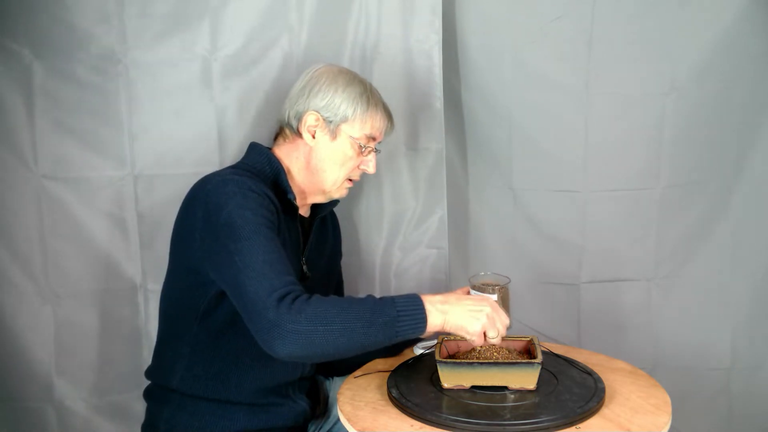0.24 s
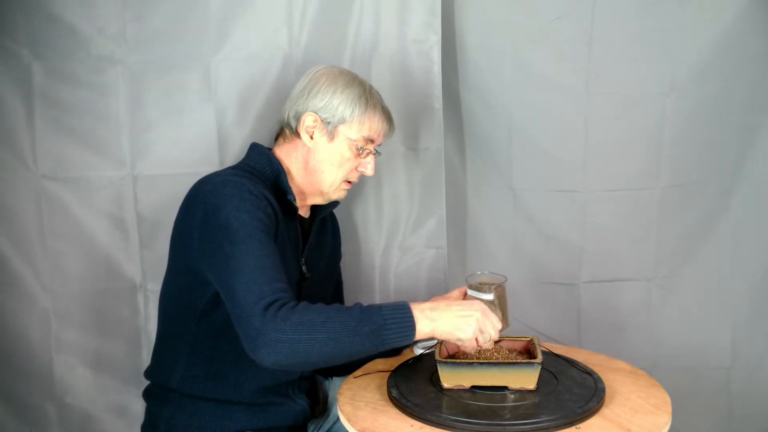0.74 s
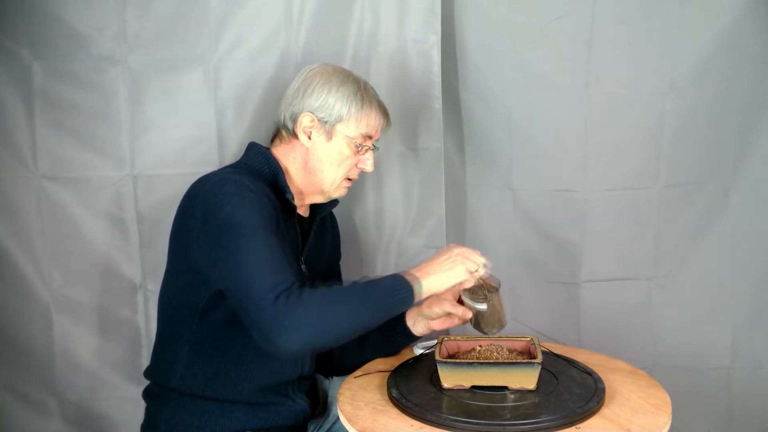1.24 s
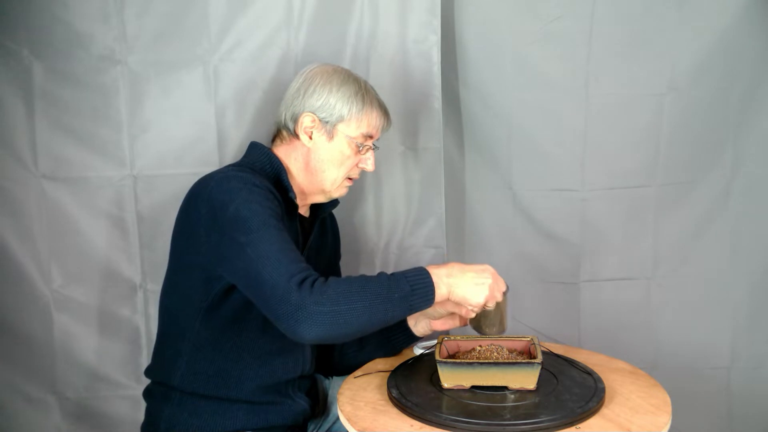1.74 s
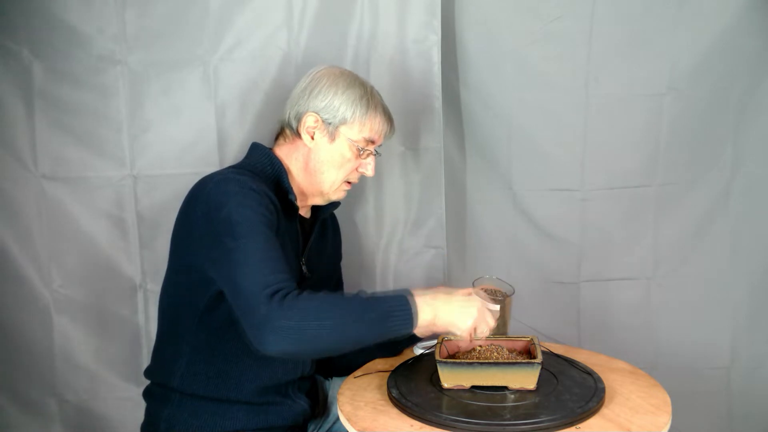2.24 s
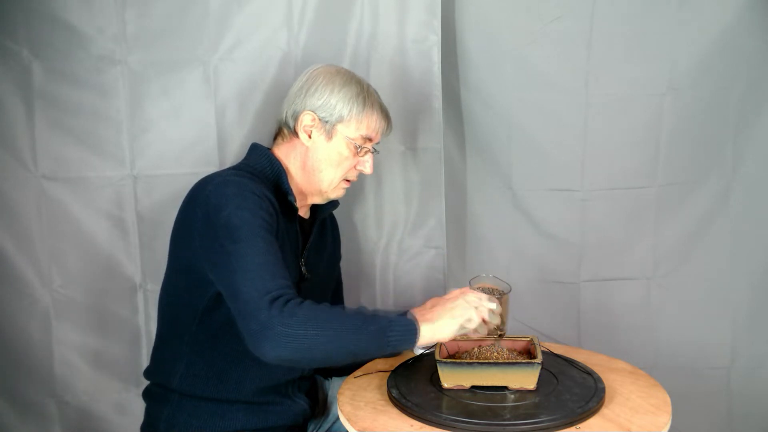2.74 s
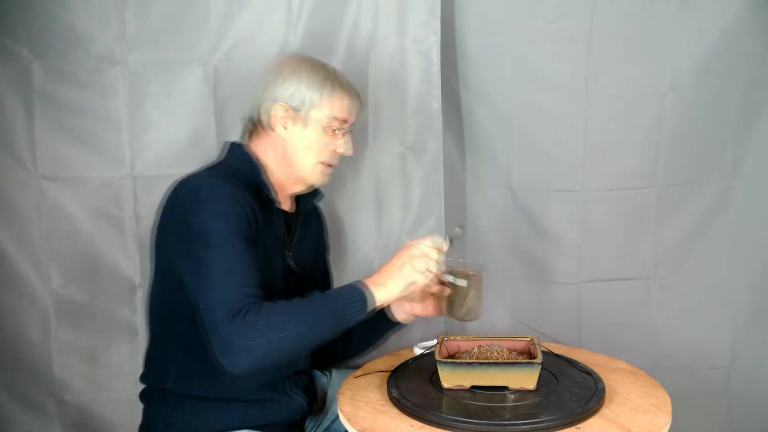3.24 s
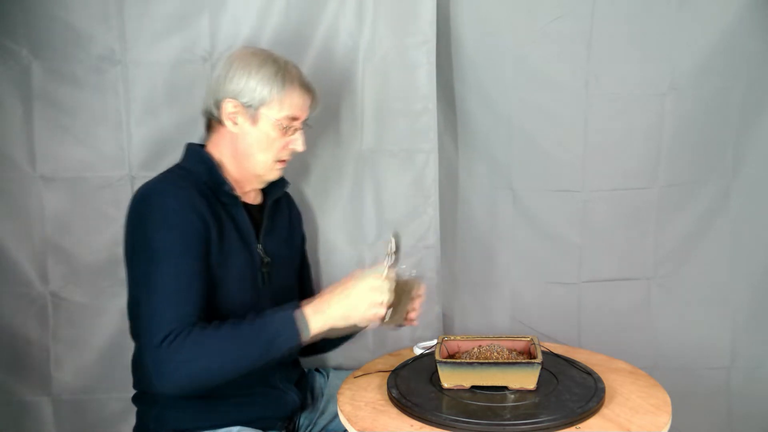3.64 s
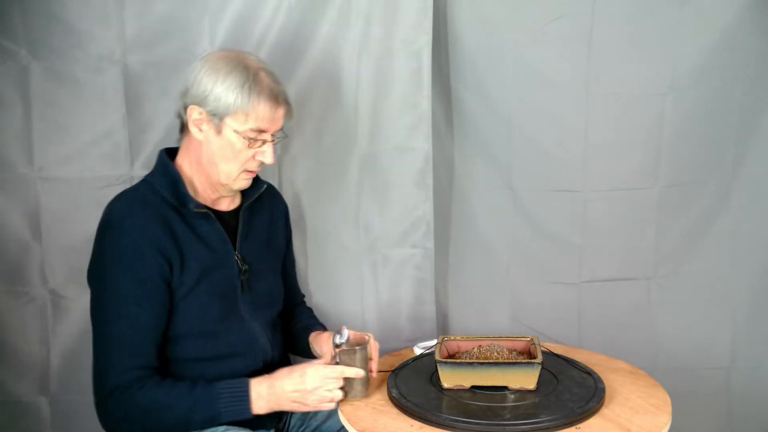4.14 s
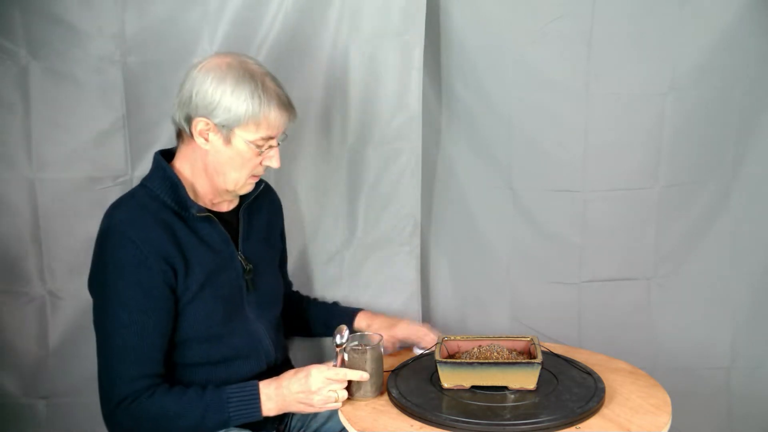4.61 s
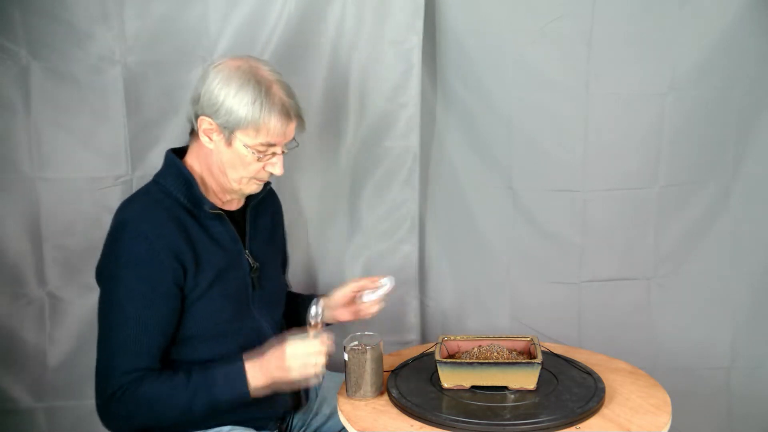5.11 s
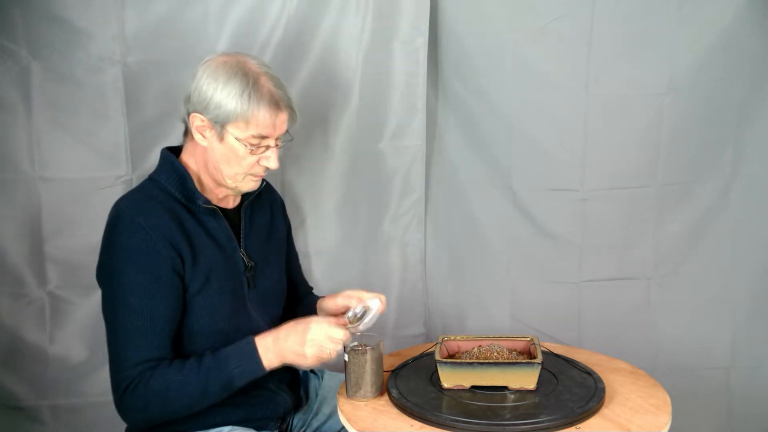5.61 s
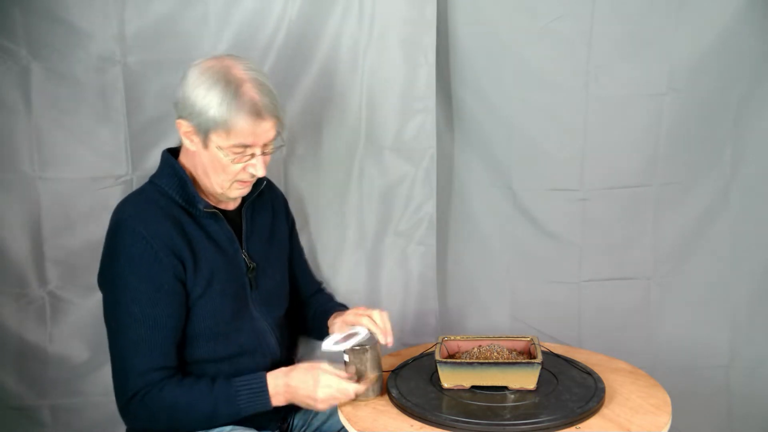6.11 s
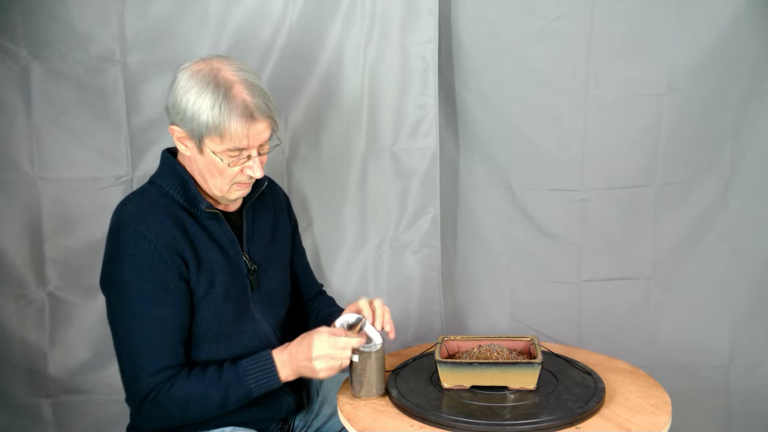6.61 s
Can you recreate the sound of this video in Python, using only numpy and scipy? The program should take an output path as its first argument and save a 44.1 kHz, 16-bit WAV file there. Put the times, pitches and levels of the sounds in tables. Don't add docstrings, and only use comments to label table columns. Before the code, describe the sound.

Sparse taps and a brief granule pour, a glass clink, a scraping, squeaking lid, then hard plastic rattles and a loud snap in a reverberant room.

```python
import sys
import numpy as np
from scipy import signal
from scipy.fft import rfft, irfft, next_fast_len
from scipy.io import wavfile
from scipy.ndimage import uniform_filter1d

SR = 44100
rng = np.random.default_rng(int(sys.argv[2]) if len(sys.argv) > 2 else 0)


def linear_from_db(decibels):
    return 10 ** (np.asarray(decibels, float) / 20)


def store_pcm(level_fs):
    pcm = np.round(np.clip(level_fs, -1, 1) * 32767).astype(np.int16)
    wavfile.write(sys.argv[1], SR, np.atleast_2d(pcm).T)


N = 302526

# centre in Hz, width in Hz, level in dB.
JAR_MODES = [(626, 196, 4.5), (1325, 340, 2.5), (1970, 380, -2.5), (2850, 900, 1.5), (3600, 430, 6),
             (5100, 1300, 0.5), (10900, 9300, -6.5)]
# centre in Hz, width in Hz, level in dB.
DRAGGED_LID_MODES = [(332, 110, -11), (533, 61, 0), (701, 53, -3.5), (858, 72, 0.5), (1306, 185, -2),
                     (1620, 480, -12.5), (2460, 670, 1.5), (3860, 860, 3.5), (5170, 2000, -2),
                     (10900, 8400, -29)]


def along(points, hz):
    f, v = np.transpose(points)
    return np.interp(np.log(hz + 1), np.log(f + 1), v)


def unit(x):
    return x / np.sqrt(np.mean(x ** 2) + 1e-20)


def coloured(spectrum):
    size = next_fast_len(N)
    white = rfft(rng.standard_normal(size))
    shape = linear_from_db(along(spectrum, np.fft.rfftfreq(size, 1 / SR)))
    return unit(irfft(white * shape, size)[:N])


def noise_swells():
    # start in seconds, hum lift in dB, hiss lift in dB, #
    # fading time in seconds.
    openings = [(1.01, 6.5, -0.5, 0.16), (1.25, 3.5, 3.5, 0.21), (3.34, 2, 2, 0.31), (3.97, 13, 6, 0.33),
                (4.13, -0.5, 2.5, .3), (4.7, 3, 5, 0.41), (4.9, 4, 4, 0.18), (5.41, 6, 8, 0.24),
                (5.66, 2.5, 8, 0.18), (5.85, 9, 4, 0.26), (6.01, 11.5, 14, 0.31), (6.16, 5, 11, 0.13)]
    opens_s = 0.04
    s, hum_db, hiss_db, closing_s = np.transpose(openings)
    since = np.maximum(np.arange(N) / SR - s[:, None], 0)
    swell = 1 - np.exp(-(since / opens_s) ** 2)
    opening = swell * np.exp(-(since / closing_s[:, None]) ** 2.04)
    return hum_db @ opening, hiss_db @ opening


def camera_noise():
    # frequency in Hz, density in dB per Hz.
    rumble_spectrum = [(25, 0.5), (60, 0), (80, -7), (100, -3.5), (160, -6), (250, -11), (400, -39)]
    # frequency in Hz, density in dB per Hz.
    hiss_spectrum = [(120, -32), (200, -5), (459, -6), (591, -8), (647, -8), (1240, -10.5), (1780, -12),
                     (15000, -17)]
    mains_hz, hum_rest_db, hiss_rest_db = 50, -62, -69
    hum_lift_db, hiss_lift_db = noise_swells()
    turn = 2 * np.pi * mains_hz * np.arange(N) / SR
    hum = np.sqrt(2) * (np.sin(turn + 0.64) + linear_from_db(-15.0) * np.sin(3 * turn + 1.32))
    low = hum + linear_from_db(-12.5) * coloured(rumble_spectrum)
    return linear_from_db(hum_rest_db + hum_lift_db) * low + linear_from_db(hiss_rest_db + hiss_lift_db) * coloured(hiss_spectrum)


def room(wet_db, direct_db=0):
    # frequency in Hz, time to fall 60 dB in seconds.
    decay = [(100, 0.87), (400, 0.34), (1200, 0.4), (1600, 0.46), (2000, 0.44), (4000, 0.49), (10000, 0.43)]
    # delay in seconds, level in dB.
    reflections = [(.0009, -2.5), (.0052, -7), (.0095, -10.5), (.012, -5.5)]
    build_up_s, early_db, early_s = 0.0055, -9.5, 0.049
    hz, t, z = signal.stft(rng.standard_normal(SR // 2), SR, nperseg=256)
    t60_s = np.clip(along(decay, hz), .05, 2)[:, None]
    tail = signal.istft(z * linear_from_db(-60 * t / t60_s), SR, nperseg=256)[1]
    now = np.arange(len(tail)) / SR
    tail = tail * (1 - np.exp(-(now / build_up_s) ** 2))
    tail = tail * (1 + linear_from_db(early_db) * np.exp(-now / early_s))
    tail = linear_from_db(wet_db) * tail / np.linalg.norm(tail)
    tail[0] = linear_from_db(direct_db)
    for s, db in reflections:
        tail[round(s * SR)] += linear_from_db(db + rng.normal(0, 1.0)) * rng.choice([-1, 1])
    return tail


def soft_push(contact_s):
    u = np.arange(256) / SR / contact_s
    push = u * np.exp(-u)
    return push / np.sum(push)


def ring(modes, gains_db=0, size=2048):
    f = np.fft.rfftfreq(size, 1 / SR)
    gains = linear_from_db(gains_db) * np.ones(len(modes))
    response = 0
    for k, ((centre, width, db), gain) in enumerate(zip(modes, gains)):
        damping = 1j * f * width
        response = response + (-1) ** k * gain * linear_from_db(db) * damping / (centre * centre - f * f + damping)
    return irfft(response, size)


def knocks(events, modes, contact_s, snap_db=-3):
    snap_wider_hz, snap_contact_s, ringing_db = 710, 0.00005, -4
    snap_lowest_hz = 543
    shaded_hz = 5450
    out, hz = np.zeros(N + SR), np.array(modes)[:, 0]
    middle_modes = [m for m in modes if 900 <= m[0] <= 2300] or modes
    middle = np.abs(ring(middle_modes)).max()
    damped = [(c, w + snap_wider_hz, db) for c, w, db in modes]
    bass_cut = signal.butter(2, snap_lowest_hz, 'high', fs=SR, output='sos')
    shade = signal.butter(2, shaded_hz, fs=SR, output='sos')
    for s, db, body_db, edge_db, wet_db in events:
        gains_db = np.where(hz < 900, body_db + 3, np.where(hz > 2300, edge_db, 0))
        ringing = np.convolve(ring(modes, gains_db), soft_push(contact_s))
        snap = np.convolve(ring(damped, gains_db), soft_push(max(contact_s, snap_contact_s)))
        if hz.max() > snap_lowest_hz:
            snap = signal.sosfilt(bass_cut, snap)
        snap = snap * np.abs(ringing).max() / np.abs(snap).max()
        direct = linear_from_db(ringing_db) * ringing + linear_from_db(snap_db) * snap
        heard = signal.fftconvolve(ringing, room(wet_db, direct_db=-np.inf))
        heard[:len(direct)] += signal.sosfilt(shade, direct)
        out[round(s * SR):][:len(heard)] += linear_from_db(db - 1.5) / middle * heard
    return out[:N]


def rub(strokes, modes, colour_db, release_db_per_s, density, spike_db, splits, wet_db, contact_s=.00001):
    out = np.zeros(N + 2 * SR)
    groups = [ring([m for m in modes if np.searchsorted(splits, m[0]) == k]) for k in range(3)]
    t = np.arange(SR // 2) / SR
    for s, rise_s, hold_s, db, bright_db in strokes:
        release = linear_from_db(-release_db_per_s * np.maximum(t - rise_s - hold_s, 0))
        pressure = np.minimum(t / rise_s, 1) ** 0.95 * release
        slips = rng.random(len(t)) < density / SR
        size = linear_from_db(spike_db * np.minimum(rng.exponential(size=len(t)), 2))
        grains = unit(slips * rng.standard_normal(len(t)) * size)
        body = 0
        for k, group in enumerate(groups):
            body = body + linear_from_db(colour_db[k] + (k - 1) * bright_db) * group / np.linalg.norm(group)
        body, space = np.convolve(body, soft_push(contact_s)), room(wet_db)
        body = signal.fftconvolve(body, space / np.linalg.norm(space))
        heard = signal.fftconvolve(grains * pressure, body)
        out[round(s * SR):][:len(heard)] += linear_from_db(db) * heard
    return out[:N]


def hand_on_table():
    # start in seconds, peak in dB.
    bumps = [(1.03, -58.5), (4.878, -57), (5.502, -45.5), (5.662, -42.5), (5.728, -51), (6.011, -35.5),
             (6.16, -43), (6.431, -57), (6.633, -52.5)]
    # centre in Hz, width in Hz, level in dB.
    board_modes = [(85, 38, 2), (227, 104, 6.5)]
    return knocks([(s, 0, db, 0, 3) for s, db in bumps], board_modes, contact_s=0.00054)


def granules():
    # start, rise and hold in seconds, level in dB, brightness in dB.
    rushes = [
        (1.212, 0.019, .002, -72, 0),
        (1.236, 0.0016, 0.0062, -56.5, -1.5),
        (1.255, 0.028, 0.053, -65, -1.5),
        (1.31, 0.032, .03, -63.5, 5),
        (1.37, 0.026, 0.035, -63.5, -2),
        (1.44, .01, 0.099, -75, 3),
    ]
    return rub(rushes, JAR_MODES, colour_db=(5, 0, -1.5), release_db_per_s=500, density=1500, spike_db=2.0,
               splits=(2300, 7000), wet_db=2.5)


def spoon():
    # start in seconds, peak in dB, body under 900 Hz in dB,
    # edge over 2300 Hz in dB, share sent into the room in dB.
    taps = [
        (1.0068, -31.5, -2.5, -21, 0),
        (1.0535, -54, 2.5, -30, 9.5),
        (1.7425, -46.5, -4, -10, -1),
        (2.4795, -59, -18, -12, 13),
        (3.6576, -53.5, -12, -4, 1),
        (3.8594, -59, -1.5, 3, 5),
    ]
    tinks = [
        (.338, -58, -16, -8, 1.5),
        (1.0075, -47.5, -31, -21, -6),
        (1.743, -56, -12, -18, -10),
    ]
    # centre in Hz, width in Hz, level in dB.
    spoon_modes = [(607, 167, 5.5), (1200, 350, -1.5), (4300, 2200, -4)]
    handle_modes = [(590, 300, -7), (2170, 73, -1), (3030, 150, 1.5), (3640, 160, -5)]
    bowl = knocks(taps, spoon_modes, contact_s=.00006)
    return bowl + knocks(tinks, handle_modes, contact_s=.00003, snap_db=-15)


def jar():
    # start in seconds, peak in dB, body
    # under 900 Hz in dB, # edge over 2300 Hz in dB, share sent into the room in dB.
    taps = [
        (1.2358, -43, -5.5, -2, 4.7),
        (1.2642, -45, 3.5, -12, 2.8),
        (1.3445, -54.5, -3, -2, 12),
        (1.3893, -52, 7.5, -0.5, 7.3),
        (1.4004, -52, -12, -13, 5),
        (1.824, -74, -7, 7, 5),
        (2.2713, -61, -5, -0.5, 9.3),
        (4.4084, -58.5, -2.5, 2, 5.9),
    ]
    stab = [
        (3.324, -35, -0.5, -3.5, 4),
    ]
    spoon_lands = [
        (4.1303, -31.5, -11, -11.5, 6.4),
    ]
    set_down = [
        (3.9695, -40.5, 3, -10.5, 12.8),
        (3.979, -42, 2.5, -16, 12.4),
        (3.994, -34, -17, -21, 6.7),
        (4.001, -35, -5.5, -18, 7.1),
    ]
    # centre in Hz, width in Hz, level in dB.
    filled_modes = [(570, 114, 3.5), (815, 290, -1), (1224, 250, 0.5), (1930, 210, -5), (2530, 120, 5),
                    (3070, 600, -2), (4630, 900, -7.5), (5700, 180, 1.5), (8650, 1700, -14)]
    spoon_on_table_modes = [(610, 200, 4), (1145, 114, -2.5), (1364, 33, -3), (1550, 140, -6), (1905.6, 180, 0),
                            (2800, 430, 0), (3300, 540, 2), (5100, 377, -2.5), (5700, 230, -2), (8900, 6900, -13)]
    table_modes = [(117, 120, -11), (262, 21, 1), (540, 193, -2), (815, 200, -2.5), (1060, 103, -2.5),
                   (1423, 290, -5), (2600, 290, -1.5), (3600, 240, -0.5), (5500, 670, -6.5),
                   (10300, 3900, -10)]
    out = knocks(taps, JAR_MODES, contact_s=.00002, snap_db=-7.5)
    out = out + knocks(stab, filled_modes, contact_s=.00003)
    out = out + knocks(spoon_lands, spoon_on_table_modes, contact_s=.00002)
    return out + knocks(set_down, table_modes, contact_s=.00004, snap_db=-9)


def squeaks():
    # start in seconds, length in seconds, pitch in Hz, level in dB.
    slips = [
        (4.737, .04, 535, -42.5),
        (4.801, 0.014, 900, -47.5),
        (4.832, 0.022, 1340, -55),
        (4.665, .06, 880, -58),
        (4.84, 0.018, 850, -52),
    ]
    out = np.zeros(N + SR)
    for s, length_s, hz, db in slips:
        u = np.arange(round(length_s * SR)) / SR / length_s
        wobble = unit(uniform_filter1d(rng.standard_normal(len(u)), size=120))
        pitch_hz = hz * (1 + .04 * (u - .5) + 0.022 * wobble)
        rough_db = 2.1 * unit(uniform_filter1d(rng.standard_normal(len(u)), size=90))
        swell = np.sin(np.pi * u) ** 0.39 * linear_from_db(rough_db)
        tone = swell * np.sin(2 * np.pi * np.cumsum(pitch_hz) / SR)
        heard = signal.fftconvolve(tone, room(wet_db=-2, direct_db=6))
        out[round(s * SR):][:len(heard)] += linear_from_db(db) * heard
    return out[:N]


def lid_dragged():
    # start, rise and hold in seconds, level in dB, brightness in dB.
    drag = [
        (4.595, 0.09, 0.076, -48, -1),
        (4.7, 0.094, 0.08, -53, 7.5),
        (4.735, 0.014, .012, -49.5, -8),
        (4.798, 0.014, 0.016, -48.5, -2.5),
        (4.83, 0.022, 0.029, -52.5, 7.5),
        (4.93, .03, 0.11, -73.5, 8),
    ]
    # start in seconds, peak in dB, body under 900 Hz in dB,
    # edge over 2300 Hz in dB, share sent into the room in dB.
    catches = [
        (4.678, -60, 3, -9, 4.9),
        (4.806, -47.5, 6, -15, 2.6),
        (4.845, -41, 0, -13, 2.1),
        (4.876, -58, -19, -13, 3.4),
    ]
    scrape = rub(drag, DRAGGED_LID_MODES, colour_db=(-8, 0, -4), release_db_per_s=400, density=700, spike_db=3,
                 splits=(700, 2300), wet_db=6.5, contact_s=.00003)
    return scrape + knocks(catches, DRAGGED_LID_MODES, contact_s=.00004)


def lid_on_jar():
    # start in seconds, peak in dB, body under 900 Hz in dB,
    # edge over 2300 Hz in dB, share sent into the room in dB.
    taps = [
        (5.4122, -29.5, -6, -2.5, 7.8),
        (5.4496, -32.5, -20, -9.5, 5.8),
        (5.5013, -41.5, 3, -16, 2.9),
        (5.8103, -37.5, -2.5, -8.5, 5.9),
        (5.8492, -33, -2.5, 2.5, 4.4),
        (5.9161, -37, -0.5, -2, 7.7),
        (6.1535, -32, 1, 3, 4.7),
        (6.1789, -43, -11, -14, 6.9),
    ]
    flat = [
        (5.6567, -21, -6.5, -11, 4.5),
    ]
    thread_snap = [
        (6.0075, -16.5, -16.5, -3, 5.7),
    ]
    seating = [
        (6.3584, -53, -16, -24.5, 7.3),
        (6.549, -59.5, -11, -14, 4.4),
        (6.6821, -57, -0.5, -6.5, 7.3),
        (6.738, -52.5, -4, -14, 7),
        (6.8339, -63, 1.5, -4, 8.8),
    ]
    # start, rise and hold in seconds, level in dB, brightness in dB.
    first_touch = [
        (5.335, 0.0085, 0.022, -66.5, 3),
    ]
    twists = [
        (5.812, 0.0082, 0.073, -78.5, -27),
        (5.92, .02, .06, -66, 9),
        (6.16, 0.012, 0.013, -58, -8),
        (6.19, 0.044, 0.019, -53.5, 1.5),
        (6.27, .005, 0.032, -82, 4),
    ]
    # centre in Hz, width in Hz, level in dB.
    lid_modes = [(253, 64, 1.5), (438, 127, 8.5), (618, 210, 12), (1323, 140, 8.5), (1556, 102, 10),
                 (1656, 26, -2.5), (2050, 350, -34), (2410, 1280, 0.5), (2840, 220, 7.5), (3570, 550, -4),
                 (4600, 530, -0.5), (5350, 750, -4.5), (8300, 8050, -8.5), (12000, 29000, -14.5)]
    on_rim_modes = [(250, 69, -10), (446, 34, 6), (658, 87, 3), (910, 205, -3), (1280, 181, 1.5),
                    (1495, 225, 1), (1624, 45, 1), (1850, 610, -20.5), (3120, 350, -1), (3600, 200, 0.5),
                    (4240, 770, -3.5), (5900, 1100, -11), (12000, 7200, -22)]
    on_thread_modes = [(245, 180, -12), (575, 520, 5), (1030, 263, -4), (1290, 95.5, 4), (1484, 90, 2),
                       (1560, 35.7, 6.5), (2090, 300, -7.5), (2830, 470, 0), (3260, 300, 3.5),
                       (3570, 150, 0.5), (4100, 660, -2), (5650, 1100, -9.5), (8450, 2900, -37),
                       (11830, 22000, -15.5)]
    rim_modes = [(644, 137, 3), (1723, 100, 2), (2850, 370, 3), (3530, 110, -16)]
    out = knocks(taps, lid_modes, contact_s=.00002)
    out = out + knocks(flat, on_rim_modes, contact_s=.00002, snap_db=0)
    out = out + knocks(thread_snap, on_thread_modes, contact_s=.000035, snap_db=-1.5)
    out = out + knocks(seating, rim_modes, contact_s=.00004, snap_db=-12)
    out = out + rub(first_touch, on_thread_modes, colour_db=(-12, 0, -5), release_db_per_s=450, density=4000,
                    spike_db=-3.0, splits=(1100, 2300), wet_db=-15)
    return out + rub(twists, lid_modes, colour_db=(7, 0, -14), release_db_per_s=448, density=770, spike_db=2,
                     splits=(2300, 7000), wet_db=-5)


def scene():
    lid = squeaks() + lid_dragged() + lid_on_jar()
    return (hand_on_table() + granules() + spoon() + jar() + lid)[None]


def treble_gaps(x):
    attacks = [3.3125, 4.113, 5.393, 5.644, 5.838, 6.001]
    hz, t, z = signal.stft(x, SR, nperseg=1024)
    field = uniform_filter1d(rng.standard_normal(z.shape[1:]), size=4, axis=0)
    field = unit(uniform_filter1d(field, size=4, axis=1))
    threshold = np.interp(hz, [9000, 12200, 12700, 15000, 15500], [4, 2.4, .85, .8, -1.2])
    holes = field > threshold[:, None]
    full = signal.istft(z * ~holes * (hz < 15450)[:, None], SR, nperseg=1024)[1][:, :N]
    dull = irfft(rfft(full) * (np.fft.rfftfreq(N, 1 / SR) < 8750), N)
    now = np.arange(N) / SR
    around_s = np.array([-.003, 0, .018, .019, .027, .032])
    dullness = sum(np.interp(now, s + around_s, [0, 1, 1, .85, .85, 0]) for s in attacks)
    return full + dullness * (dull - full)


def roll_off(x):
    return signal.sosfilt(signal.butter(12, 15620, fs=SR, output="sos"), x)


def record(dry):
    mix = treble_gaps(dry + camera_noise())
    return roll_off(mix)


dry = scene()
out = record(dry)
store_pcm(out)
```